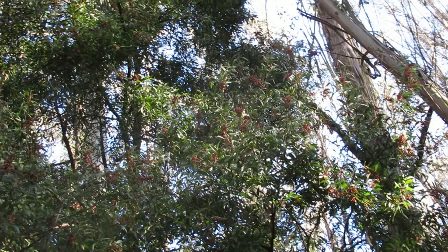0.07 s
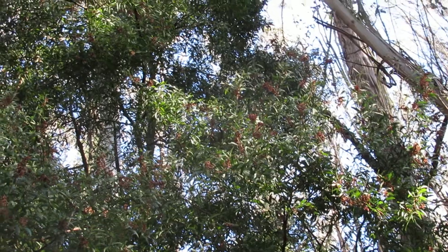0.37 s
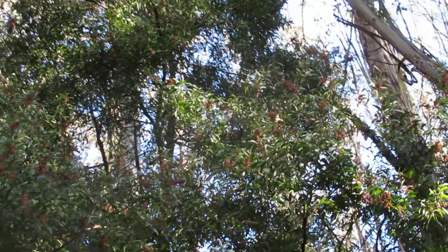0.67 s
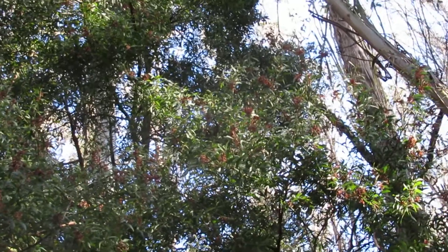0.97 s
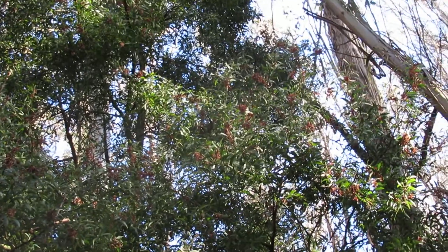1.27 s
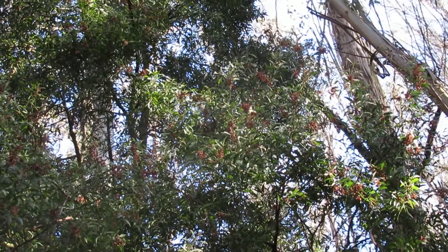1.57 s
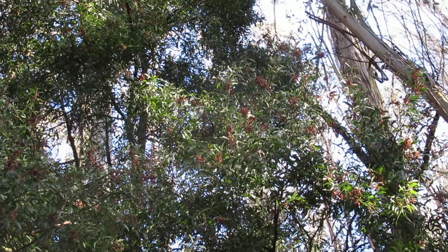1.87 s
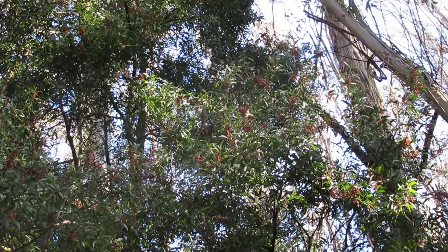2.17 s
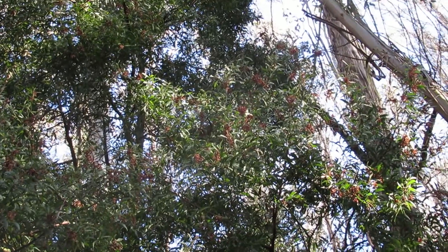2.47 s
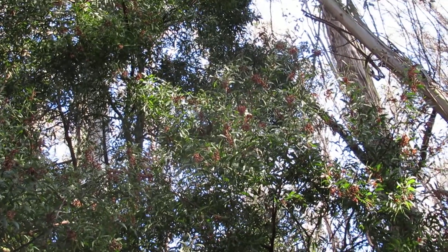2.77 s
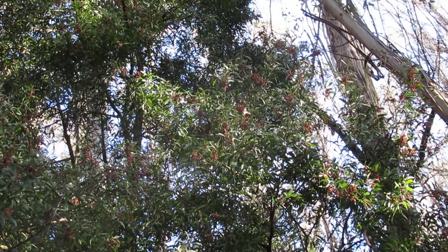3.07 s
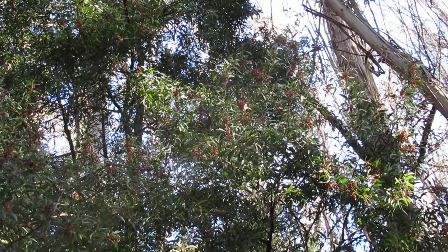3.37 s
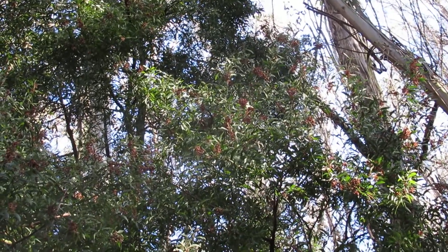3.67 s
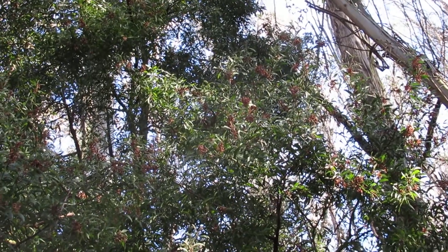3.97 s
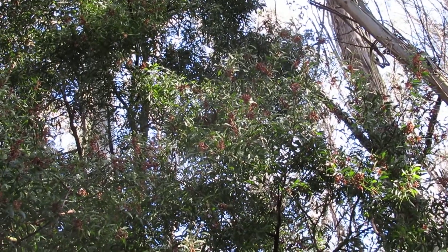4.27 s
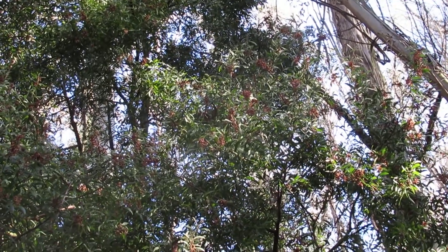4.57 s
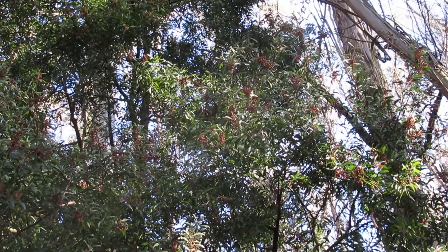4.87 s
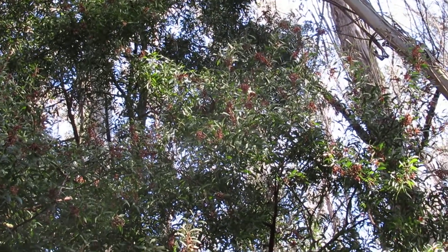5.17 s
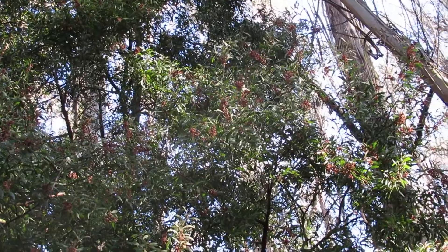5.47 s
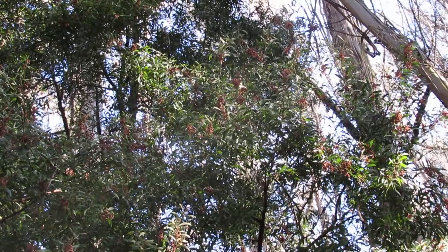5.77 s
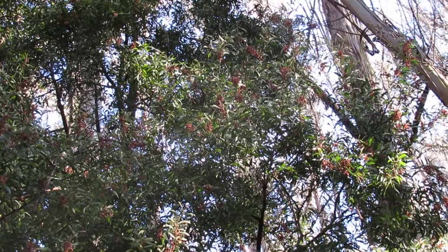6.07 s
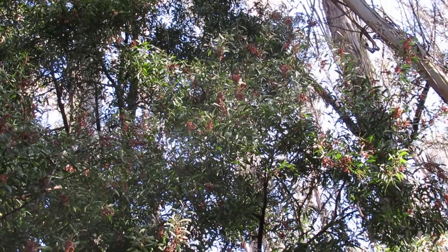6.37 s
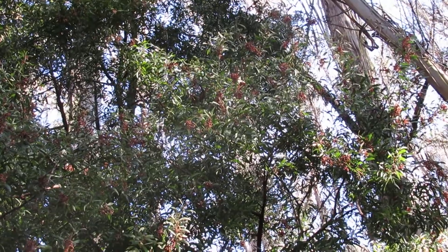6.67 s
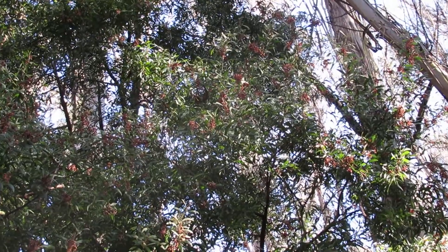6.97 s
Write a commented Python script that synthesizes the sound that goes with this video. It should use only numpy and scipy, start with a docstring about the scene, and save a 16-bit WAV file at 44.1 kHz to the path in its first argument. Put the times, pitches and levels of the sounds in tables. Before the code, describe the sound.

A frog some way off gives a two-part croak, and another near the microphone answers more loudly and slowly. They alternate about four times each, their clicking, ringing calls echoing through the wood. Two small twig ticks come early, and a third frog rattles briefly later on. Behind them lie a faint distant frog chorus, a few soft whistles and a steady low rush of air.

```python
"""A wood, with one frog close to the microphone, one answering further off, and a third rattling drily.
Each two-part call is a rising train of clicks and then a louder falling one, at times with a few
clucks after it; every click rings the throat and vocal sac. The ground and trunks echo them
over a distant chorus, a few faint whistles, twig ticks and a low steady rush."""
import sys
import numpy as np
from scipy import signal
from scipy.fft import rfft, irfft
from scipy.io import wavfile
from scipy.ndimage import uniform_filter1d

SR = 44100
rng = np.random.default_rng(int(sys.argv[2]) if len(sys.argv) > 2 else 0)


def waveform_to_disk(signal):
    """Save audio, clipped to [-1, 1], as 16-bit WAV at the path in sys.argv[1]."""
    frames = np.transpose(np.atleast_2d(signal))
    scaled = np.clip(frames, -1, 1) * 32767
    samples = np.round(scaled).astype(np.int16)
    wavfile.write(sys.argv[1], SR, samples)


N = 313992
TIME = np.arange(N) / SR


def near_frog():
    """Close to the microphone: slow, ringing pulses with a clear bounce off the ground."""
    # spectrum of the snap that opens each pulse: frequency_hz, level_db
    snap = [(600, -61), (1050, -1.5), (1500, -1), (2100, 0), (2800, 3.5), (3450, -1.5), (4000, -16),
            (4800, -19.5), (7000, -49)]
    beats = openings("near", period_s=.0168, slowing=.055, fill_s=.18, swell_db=13, climb_hz=650,
                     low_hz=1205, ring_db=1.5, ring_gain_db=8, release_db=5.5)
    beats += closings("near", period_s=.0177, slowing=.015, accent_db=1.5, low_bend_hz=89,
                      high_bend_hz=110, settle_s=.014, fade_curve=1.2)
    beats += clucks("near", period_s=.0177, low_hz=1340, ring_db=-8)
    voice = throat(beats, snap, snap_db=-2.5, low_db=-2.26, high_db=-3.3,
                   low_swell_s=.0025, high_swell_s=.0014)
    return wood(voice, echo_s=.00712, echo_db=-6.5, leaves_db=-11, leaves_t60=.076,
                tail_db=-7, tail_t60=.71, build_s=.0056, linger_db=-7)


def far_frog():
    """Further off, the answer: quicker pulses, half lost in the echo of the trunks."""
    # spectrum of the snap: frequency_hz, level_db
    snap = [(600, -37), (1100, -5.5), (1500, -2), (2200, 0.5), (2700, -3.5), (3400, -8.5), (4200, -22),
            (7000, -53)]
    beats = openings("far", period_s=.0147, slowing=.02, fill_s=.12, swell_db=8.5, climb_hz=520,
                     low_hz=1285, ring_db=-1.5, ring_gain_db=6, release_db=1.3)
    beats += closings("far", period_s=.0153, slowing=.0862, accent_db=-1, low_bend_hz=15,
                      high_bend_hz=-110, settle_s=.02, fade_curve=2.8)
    beats += clucks("far", period_s=.0153, low_hz=1333, ring_db=-4.5)
    voice = throat(beats, snap, snap_db=-.9, low_db=-.1, high_db=-3,
                   low_swell_s=.0018, high_swell_s=.0011)
    return wood(voice, echo_s=.004, echo_db=-18, leaves_db=-7, leaves_t60=.12,
                tail_db=-1, tail_t60=1.04, build_s=.013, linger_db=2)


def rattling_frog():
    """The third frog, short and bright, among the ticking twigs."""
    # spectrum of the snap: frequency_hz, level_db
    snap = [(700, -31), (1200, -3), (1850, 1), (2300, -0.5), (3000, -10), (3650, 4.5), (4400, -11),
            (6200, -12), (9000, -57)]
    voice = throat(rattles(), snap, snap_db=4, low_db=-2, high_db=3,
                   low_swell_s=.001, high_swell_s=.00063)
    return wood(voice + twigs(), echo_s=.002, echo_db=-17, leaves_db=-8, leaves_t60=.021,
                tail_db=-7.5, tail_t60=.94, build_s=.0081, linger_db=-22)


def throat(beats, snap, snap_db, low_db, high_db, low_swell_s, high_swell_s):
    """Each pulse is a snap that rings the two resonances of throat and sac."""
    scatter_db, wobble, rasp, jitter_s = .8, .016, .55, .00014
    out, tick = np.zeros(N), undb(snap_db) * click(snap)
    for s, db, low_hz, high_hz, ring_db in beats:
        chance = rng.standard_normal(4)
        low = undb(low_db) * ring(low_hz * (1 + wobble * chance[0]), low_swell_s)
        high = undb(high_db) * ring(high_hz * (1 + wobble * chance[1]), high_swell_s)
        # a puff of air roughens the first milliseconds of the snap
        puff = rng.standard_normal(128) * np.hanning(128)
        rough = np.convolve(tick, puff / np.linalg.norm(puff))[:len(tick)]
        pulse = tick + rasp * rough + undb(ring_db) * (low + high)
        add(out, s + jitter_s * chance[3], undb(db + scatter_db * chance[2]) * pulse)
    return out


def openings(who, period_s, slowing, fill_s, swell_db, climb_hz, low_hz, ring_db, ring_gain_db,
             release_db):
    """As the sac fills, the pulses grow, ring more and climb in pitch; on the last one it slackens."""
    # rising first part of each call: frog, start_s, end_s, final_level_db, final_high_hz
    notes = [ ("far", 0.4000, 0.5170, -38, 2380), ("near", 1.4125, 1.5968, -26, 2640),
             ("far", 2.1525, 2.2692, -35.5, 2400), ("near", 3.1005, 3.2465, -27, 2600),
             ("far", 3.8195, 3.9225, -35.5, 2450), ("near", 4.7055, 4.9077, -25, 2670),
             ("far", 5.4290, 5.5170, -34.5, 2390), ("near", 6.7965, 6.9495, -26, 2616)]
    out = []
    for name, start, end, db, hz in notes:
        if name == who:
            s, progress = train(start, end, period_s, slowing)
            empty = np.abs(end - s) / fill_s
            level = db - swell_db * empty ** 2.6
            high = hz - climb_hz * empty ** 1.52
            ringing = ring_db - ring_gain_db * empty - release_db * (progress == 1)
            out += pulses(s, level, low_hz, high, ringing)
    return out


def closings(who, period_s, slowing, accent_db, low_bend_hz, high_bend_hz, settle_s, fade_curve):
    """The note starts with a jolt that bends both resonances, then settles and mostly fades."""
    # second part of each call: frog, start_s, end_s, level_db, fade_db, ring_db, ring_loss_db,
    # low_hz, high_hz, high_climb_hz
    notes = [ ("far", 0.6215, 0.7000, -33, 7.4, -0.76, 2, 1325, 2560, 30),
             ("near", 1.7350, 1.8385, -24.5, 3.5, 1.4, 2.4, 1250, 2760, -20),
             ("far", 2.3745, 2.4990, -34.5, 3.4, 0, -1, 1330, 2540, 50),
             ("near", 3.4182, 3.4950, -25, 11, 2.1, -3, 1224, 2670, -30),
             ("far", 4.0150, 4.0725, -34, -1.5, 0, 1, 1340, 2540, 70),
             ("near", 5.0650, 5.2065, -23, 2.1, -2.3, 4.7, 1222, 2670, 440),
             ("far", 5.6105, 5.7010, -33, 7.4, 0, 1, 1350, 2680, 90),
             ("near", 7.1052, 7.1230, -24, 1, 0, 1, 1230, 2690, -20)]
    out = []
    for name, start, end, db, fade_db, ring_db, ring_loss_db, low_hz, high_hz, climb_hz in notes:
        if name == who:
            s, progress = train(start, end, period_s, slowing)
            jolt = np.exp((start - s) / settle_s)
            level = db + accent_db * jolt - fade_db * progress ** fade_curve
            low = low_hz + low_bend_hz * jolt
            high = high_hz + high_bend_hz * jolt + climb_hz * progress
            out += pulses(s, level, low, high, ring_db - ring_loss_db * progress)
    return out


def clucks(who, period_s, low_hz, ring_db):
    """Even pulses on a slack sac, with little ring."""
    # dry clucks after a call: frog, start_s, end_s, level_db, high_hz
    notes = [ ("far", 0.7875, 0.8330, -38.5, 2520), ("far", 4.1055, 4.1055, -35, 2580),
             ("far", 4.1335, 4.2115, -34.5, 2610), ("near", 5.2392, 5.2392, -23.5, 2770),
             ("near", 5.2602, 5.2755, -25, 2880), ("near", 5.2963, 5.3125, -25.5, 3160),
             ("far", 5.7472, 5.7955, -34.5, 2880)]
    out = []
    for name, start, end, db, high_hz in notes:
        if name == who:
            s, _ = train(start, end, period_s)
            out += pulses(s, db, low_hz, high_hz, ring_db)
    return out


def rattles(period_s=.014, ring_db=6, lone_low_hz=1470, lone_high_hz=2990, lone_ring_db=-1):
    """Bursts of three or four quick pulses, and drier single clicks between them."""
    # rattles: start_s, end_s, level_db, fade_db, low_hz, high_hz
    bursts = [ (2.9455, 2.9735, -47.5, -3, 1440, 2850), (3.1024, 3.142, -37, 2, 1360, 2940),
              (3.2345, 3.274, -35, 10, 1410, 3050), (3.443, 3.4880, -41, 1, 1390, 3100),
              (6.3950, 6.4378, -39, -3, 1490, 3000), (6.5375, 6.58, -34.5, 4, 1660, 3190)]
    # single clicks: start_s, level_db
    lone_clicks = [(3.1637, -31.5), (3.4067, -32), (5.4925, -38), (5.5290, -41), (6.4673, -33.5),
                   (6.6076, -34)]
    out = [(s, db, lone_low_hz, lone_high_hz, lone_ring_db) for s, db in lone_clicks]
    for start, end, db, fade_db, low_hz, high_hz in bursts:
        s, progress = train(start, end, period_s)
        out += pulses(s, db - fade_db * progress, low_hz, high_hz, ring_db)
    return out


def wood(x, echo_s, echo_db, leaves_db, leaves_t60, tail_db, tail_t60, build_s, linger_db):
    """The way to the microphone: a ground bounce, quick scatter from leaves, a long tail from trunks."""
    scatter_hz, linger_hz, linger_width_hz = 1700, 2620, 260
    t = TIME[:SR]
    leaves = rng.standard_normal(SR) * undb(-60 * t / leaves_t60) * (t > .002)
    tail = rng.standard_normal(SR) * undb(-60 * t / tail_t60) * (1 - np.exp(-t / build_s))
    # trunks throw back short waves better than long ones
    tail = signal.sosfilt(signal.butter(1, scatter_hz, "high", fs=SR, output="sos"), tail)
    tail /= np.linalg.norm(tail)
    # the upper ring of the call stands out in the tail
    peak = signal.iirpeak(linger_hz, linger_hz / linger_width_hz, fs=SR)
    tail += undb(linger_db) * signal.lfilter(*peak, tail)
    response = undb(leaves_db) * leaves / np.linalg.norm(leaves) + undb(tail_db) * tail
    response[0] += 1  # direct sound
    response[int(echo_s * SR)] -= undb(echo_db)  # soft ground turns the bounce upside down
    return signal.fftconvolve(x, response)[:N]


def twigs(body_db=-4):
    """Small dry ticks with a very short ring."""
    # twig ticks: start_s, level_db, pitch_hz
    ticks = [(0.5954, -30, 3460), (2.102, -29, 2900)]
    # spectrum of a tick: frequency_hz, level_db
    colour = [(300, -25), (1700, 5), (2200, -2), (2900, 2), (3900, 2), (4900, -12), (6300, -4), (8000, -9),
              (14000, -45)]
    out, tick = np.zeros(N), click(colour)
    for s, db, hz in ticks:
        add(out, s, undb(db) * (tick + undb(body_db) * ring(hz, swell_s=.00032)))
    return out


def chorus(rest_db=-66, rest_hz=2736, pulse_hz=68, throb=.086):
    """Distant frogs: two resonances and a raspy edge, blurred to a flutter that swells now and then."""
    # swells of the chorus: middle_s, length_s, level_db, high_hz
    swells = [(0.98, 0.3, -61, 2700), (2.76, 0.29, -51.5, 3040), (5.448, 0.45, -55.5, 3110),
              (6.04, 0.2, -50.5, 2906), (6.259, 0.23, -45.5, 2857), (6.48, 0.45, -52, 3283)]
    groups = [(undb(rest_db) ** 2, rest_hz)]
    groups += [((undb(db) * swell(s, length)) ** 2, hz) for s, length, db, hz in swells]
    power = sum(p for p, _ in groups)
    high_hz = sum(p * hz for p, hz in groups) / power
    flutter_hz = pulse_hz * (1 + .08 * wander(18))
    flutter = 1 + throb * np.sin(2 * np.pi * np.cumsum(flutter_hz) / SR)
    high = blurred_tone(high_hz, width_hz=890)
    low = undb(-4) * blurred_tone(1270, width_hz=440)
    edge = undb(-19) * blurred_tone(4600, width_hz=1100)
    return np.sqrt(power) * unit(flutter * (high + low + edge))


def whistles():
    """Soft blurred notes from deep in the wood."""
    # far whistles: middle_s, length_s, pitch_hz, level_db
    notes = [(0.841, 0.023, 1287, -44), (3.078, 0.095, 1350, -50.5), (3.727, 0.42, 1531, -54),
             (5.058, 0.086, 1480, -45.5), (5.858, 0.1, 1127, -53), (6.274, 0.24, 1149, -50),
             (6.711, 0.33, 1132, -52.5)]
    return sum(undb(db) * swell(s, length) * blurred_tone(hz, width_hz=170)
               for s, length, hz, db in notes)


def air(level_db=-50.5, bass_hz=300, waver_db=.8):
    """Behind everything, a steady rush and hiss whose bass wavers."""
    # spectrum of the rush: frequency_hz, relative_density_db
    colour = [(15, -36), (25, -6.5), (90, 5.5), (250, -1), (700, -5.5), (1300, -7.5), (2100, -10),
              (3000, -17.5), (4500, -19), (7000, -18.5), (11000, -23.5), (15000, -29.5)]
    rush = unit(irfft(rfft(rng.standard_normal(N)) * gains(colour, N), N))
    bass = signal.sosfiltfilt(signal.butter(2, bass_hz, fs=SR, output="sos"), rush)
    return undb(level_db) * (rush + bass * (undb(waver_db * wander(10)) - 1))


def train(start, end, period_s, slowing=0):
    """Pulse times of a note and how far through it each lies (0-1); they may slow towards the end."""
    progress = np.linspace(0, 1, round((end - start) / period_s) + 1)
    return start + (end - start) * (progress - slowing * progress * (1 - progress)), progress


def pulses(*columns):
    """One row for each pulse of a note: start_s, level_db, low_hz, high_hz, ring_db."""
    return list(zip(*np.broadcast_arrays(*columns)))


def click(colour, size=1024):
    """A minimum-phase click of the given spectrum, peak 1."""
    cepstrum = irfft(np.log(gains(colour, size)))
    cepstrum[1:size // 2] *= 2
    cepstrum[size // 2 + 1:] = 0
    y = irfft(np.exp(rfft(cepstrum)))
    return y / np.abs(y).max()


def ring(hz, swell_s, size=1024):
    """A resonance that peaks at swell_s and quickly dies."""
    age = TIME[:size] / swell_s
    return age ** 2 * np.exp(2 * (1 - age)) * np.sin(2 * np.pi * hz * TIME[:size])


def blurred_tone(hz, width_hz):
    """A resonance smeared by many echoes: its level and phase wander."""
    lowpass = signal.butter(2, width_hz / 2, fs=SR, output="sos")
    a, b = signal.sosfilt(lowpass, rng.standard_normal((2, N)))
    phase = 2 * np.pi * np.cumsum(hz + np.zeros(N)) / SR
    return unit(a * np.cos(phase) + b * np.sin(phase))


def swell(middle_s, length_s):
    """A bell-shaped rise and fall, peak 1."""
    return np.exp(-(2 * (TIME - middle_s) / length_s) ** 2)


def wander(rate_hz):
    """Smooth random drift, rms 1."""
    hold = int(SR / rate_hz)
    steps = np.repeat(rng.standard_normal(N // hold + 1), hold)
    return unit(uniform_filter1d(uniform_filter1d(steps, hold), hold)[:N])


def gains(colour, size):
    """Gain of a (frequency_hz, level_db) spectrum at every bin of a transform."""
    hz, db = np.transpose(colour)
    return undb(np.interp(np.log(np.fft.rfftfreq(size, 1 / SR) + 1), np.log(hz), db))


def undb(db):
    """Decibels to gain."""
    return 10 ** (np.asarray(db) / 20)


def unit(x):
    """Scale to rms 1."""
    return x / np.sqrt(np.mean(x ** 2))


def add(out, s, sound):
    """Mix a short sound in at time s."""
    i = int(s * SR)
    out[i:i + len(sound)] += sound[:max(len(out) - i, 0)]


def scene():
    """Three frogs at their own distances from one microphone, in the sound of the wood."""
    return (near_frog() + far_frog() + rattling_frog() + chorus() + whistles() + air())[None]


def record(dry):
    """The recorder opens after a moment of silence and cuts the top above 15 kHz."""
    opened = dry * np.interp(TIME, [.14, .284, .292], [0, .004, 1])
    return signal.sosfilt(signal.ellip(10, .2, 70, 15000, fs=SR, output="sos"), opened)


dry = scene()
out = record(dry)
waveform_to_disk(out)
```